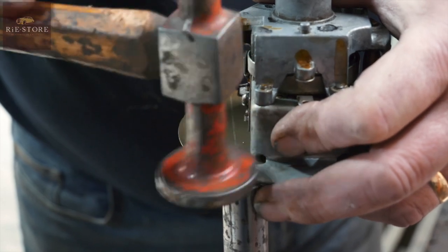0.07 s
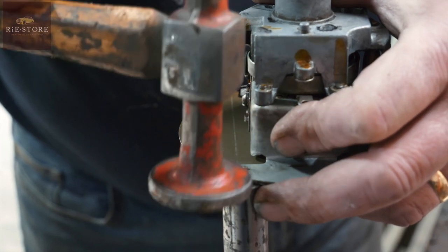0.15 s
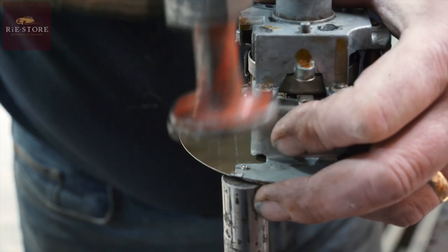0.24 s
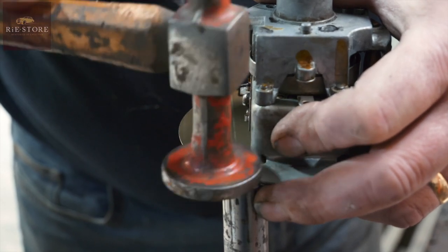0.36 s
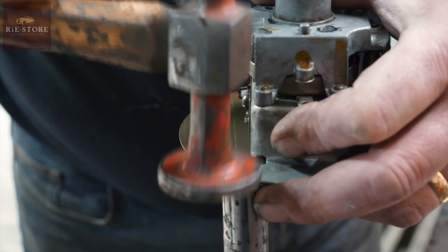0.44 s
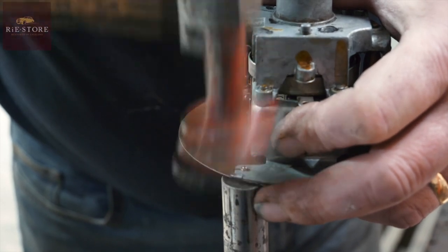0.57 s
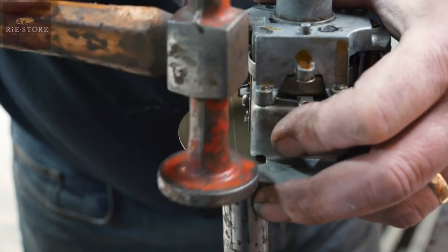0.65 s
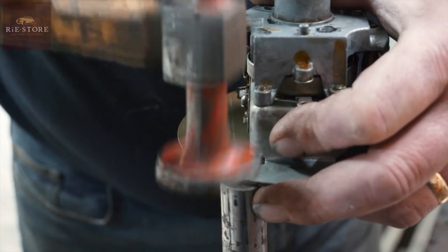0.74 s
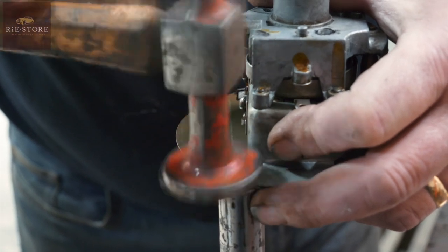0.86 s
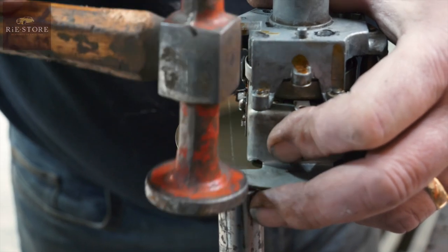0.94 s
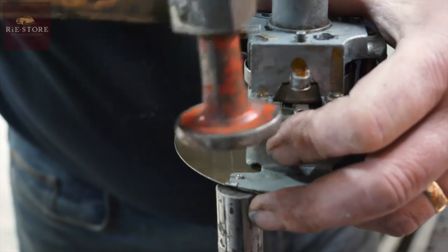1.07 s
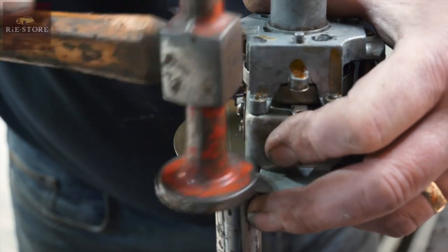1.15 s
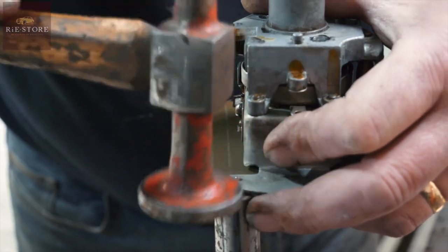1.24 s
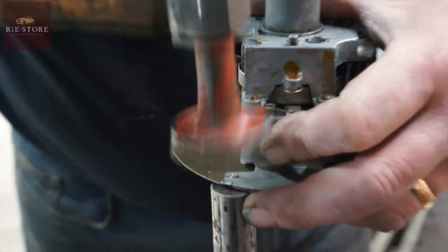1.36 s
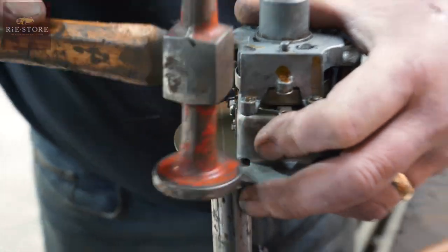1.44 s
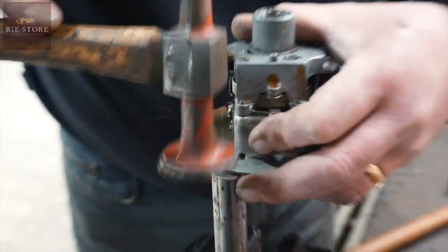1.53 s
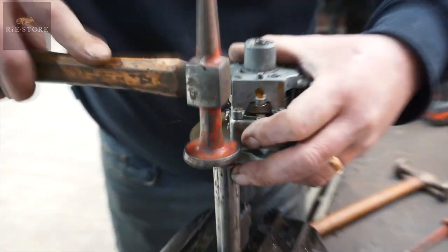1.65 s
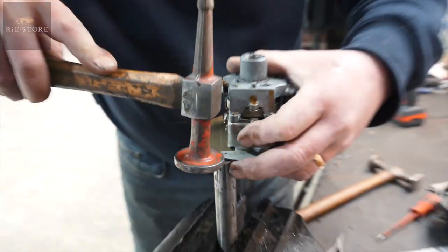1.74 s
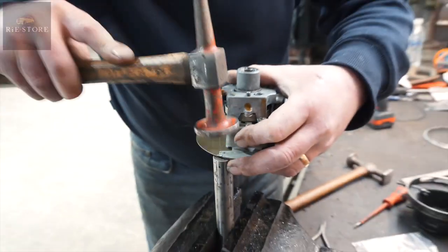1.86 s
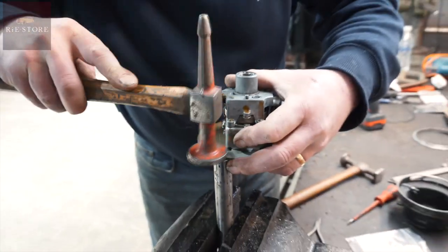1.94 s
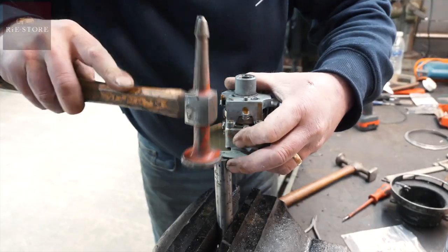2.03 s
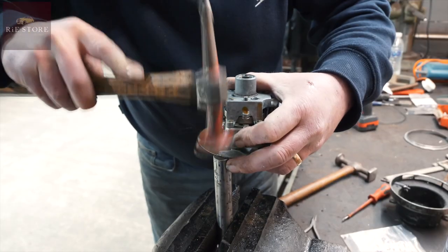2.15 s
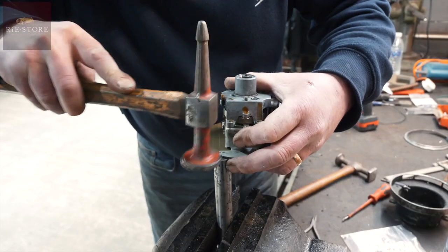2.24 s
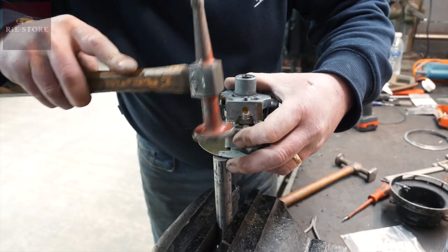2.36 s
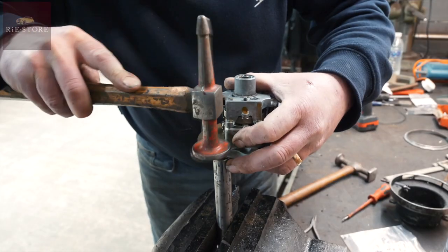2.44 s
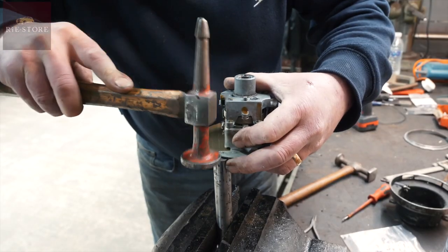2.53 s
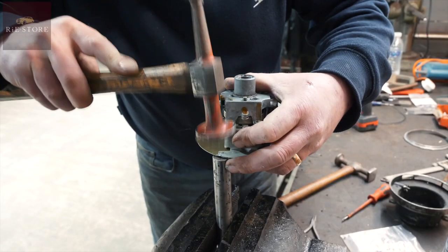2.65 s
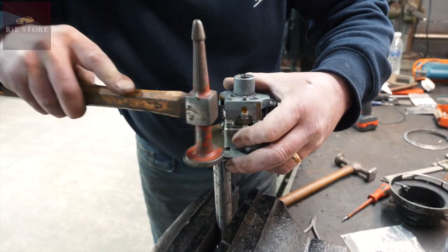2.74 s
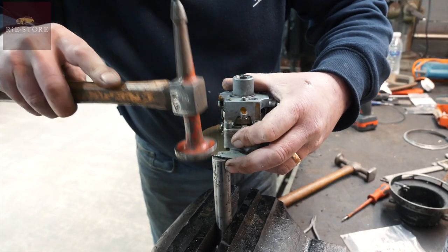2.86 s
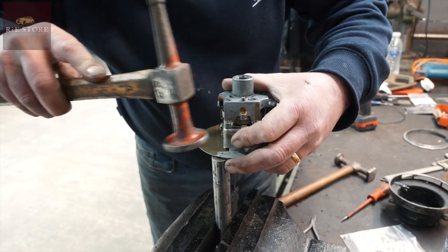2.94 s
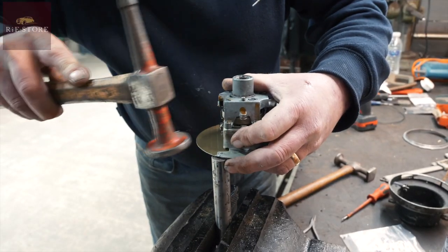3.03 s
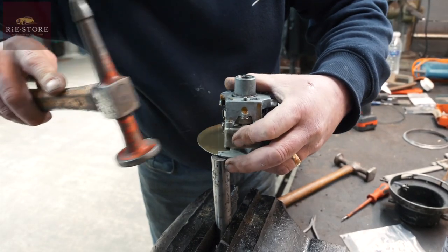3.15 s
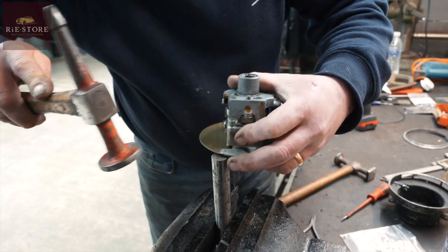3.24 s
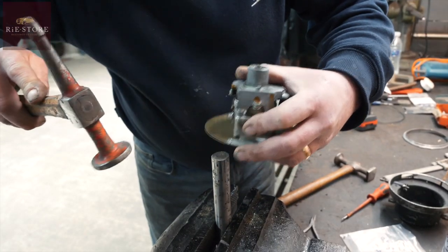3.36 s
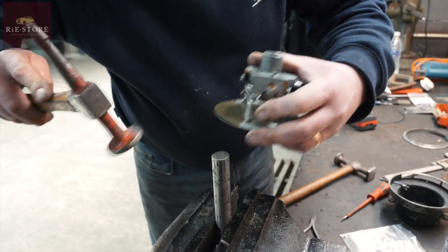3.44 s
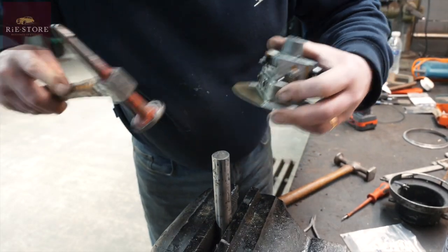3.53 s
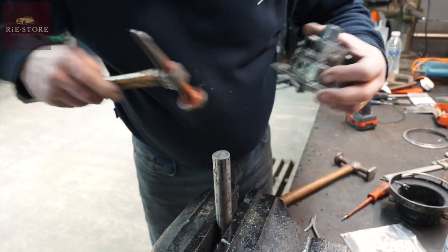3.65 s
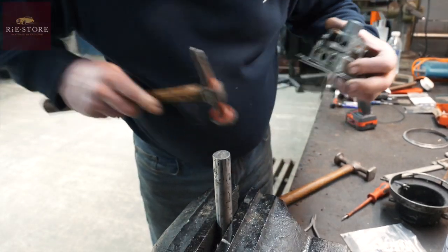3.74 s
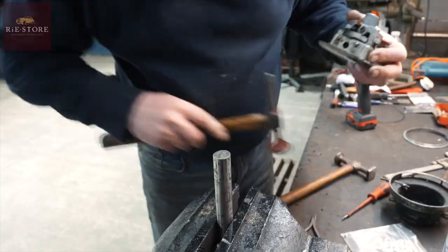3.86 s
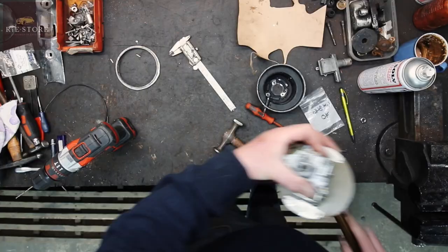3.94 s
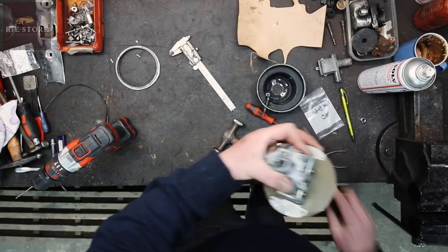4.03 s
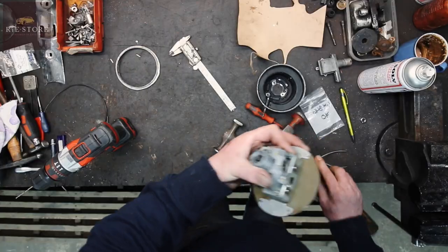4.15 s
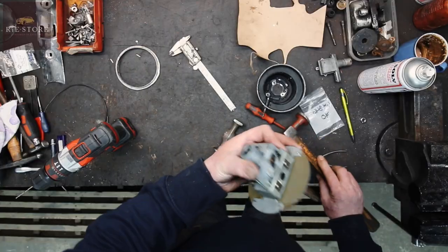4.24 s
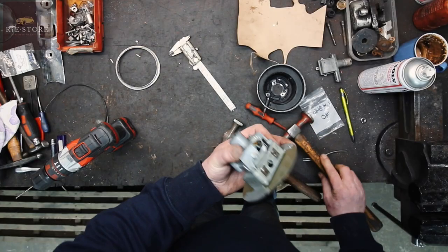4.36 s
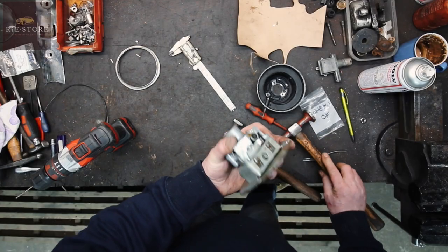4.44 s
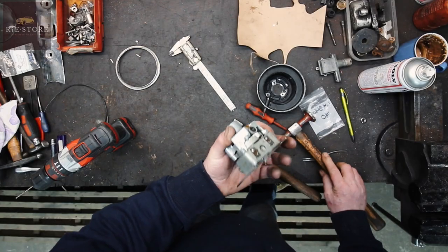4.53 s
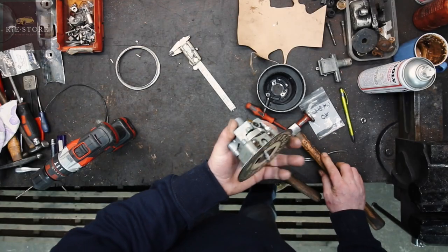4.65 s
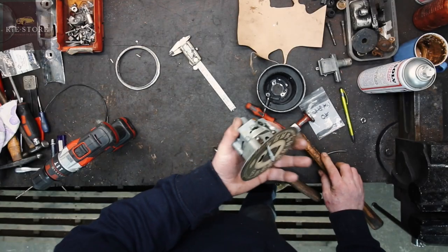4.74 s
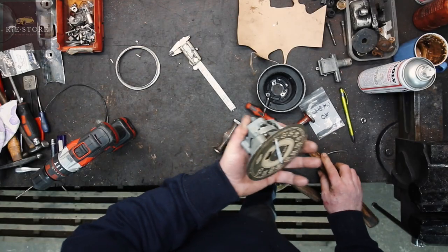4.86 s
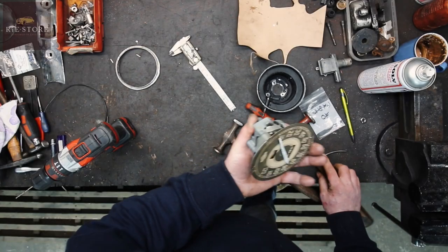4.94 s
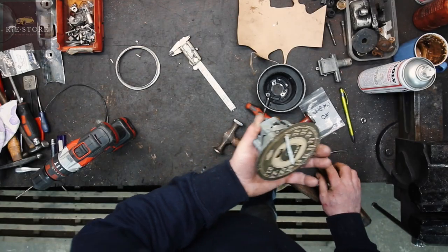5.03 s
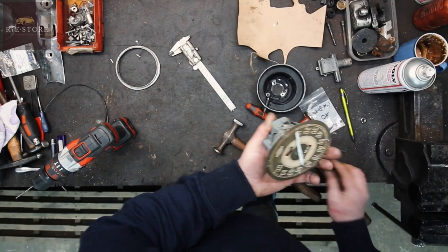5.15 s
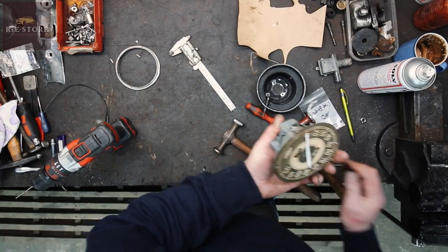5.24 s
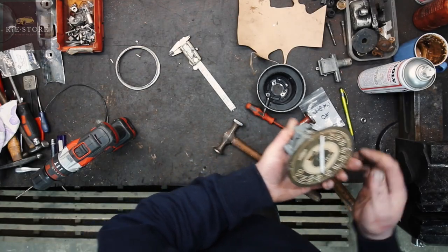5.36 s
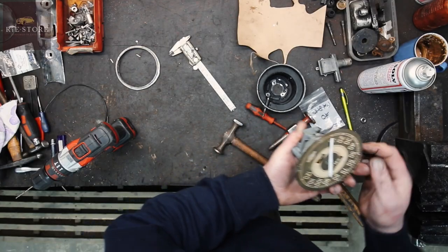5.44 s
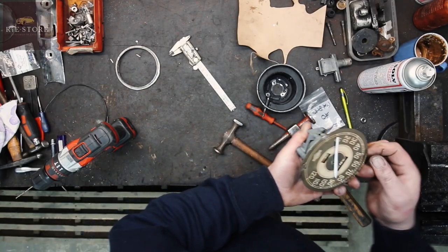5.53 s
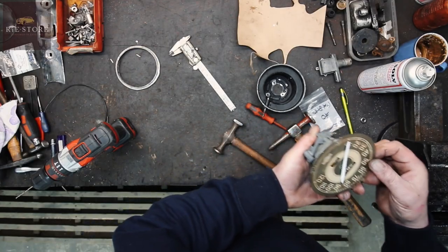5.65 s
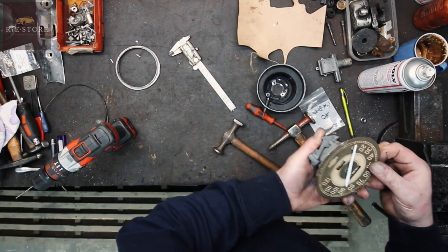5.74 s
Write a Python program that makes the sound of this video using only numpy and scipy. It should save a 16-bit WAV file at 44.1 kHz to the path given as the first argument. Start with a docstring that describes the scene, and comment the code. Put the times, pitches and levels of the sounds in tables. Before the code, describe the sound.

Even, bright steel taps run for under three seconds, captured close with the same sound in both channels and peaks squashed by limiting. The first few are slightly duller, and each has a short double rattle. A hard room answers diffusely. After a near-silent pause with a swelling low hum, a hammer head clunks on the bench among loose tools, then its wooden handle lands softly.

```python
"""Workshop: a small hammer taps eleven times on a riveted metal mechanism resting on a steel punch in a vice.
Each blow cracks (noise burst), rings the steel and thumps the vice (decaying sines); the work rebounds and rattles.
Then the hammer is laid on the bench: head first, knocking and clinking against tools, then handle.
The room adds diffuse echo (convolution with decaying noise) over a background that swells after the tapping.
Heard close, the same in both channels, with a fast limiter."""
import sys
import numpy as np
from scipy import signal
from scipy.io import wavfile
from scipy.ndimage import uniform_filter1d, minimum_filter1d

SR = 44100
rng = np.random.default_rng(int(sys.argv[2]) if len(sys.argv) > 2 else 0)


def master_out(mix):
    """Clip the mix to full scale and print it as 16-bit PCM to the path in sys.argv[1]."""
    frames = np.transpose(np.atleast_2d(mix))
    ceiling = np.clip(frames, -1, 1)
    pcm = np.round(ceiling * 32767).astype(np.int16)
    wavfile.write(sys.argv[1], SR, pcm)


N = 255339
SECONDS = np.arange(N) / SR

# All table levels are relative; t60 is the time to decay by 60 dB.
# Background level, swelling after the tapping: (time [s], level [dB])
BACKGROUND_LEVEL = [(2.9, -53), (3.41, -51.5), (5.32, -41), (5.79, -40)]
# Background colours: (frequency [Hz], density [dB per Hz])
RUMBLE_SPECTRUM = [(18, 3), (29, -2.5), (42, -3), (65, -23.5), (120, -28)]
ROOM_NOISE_SPECTRUM = [(35, -35.5), (60, -9.5), (75, -9.5), (108, 4), (135, -4.5), (196, -0.5), (289, -1),
                       (323, 0), (584, -10.5), (831, -10.5), (2570, -24), (3720, -23), (5000, -43),
                       (6500, -68), (11000, -120)]
HISS_SPECTRUM = [(2350, -23), (4000, -11), (5280, -12.5), (9280, -16), (10500, -19), (14800, -22),
                 (16000, -26)]
RUMBLE_DB, ROOM_NOISE_DB, HISS_DB = 0.5, -0.22, -26.5  # re the background level

# Workshop echo: (frequency [Hz], density [dB per Hz]) and (frequency [Hz], t60 [s])
ECHO_SPECTRUM = [(100, 10.5), (300, 3.5), (700, 3.5), (1400, 5), (2100, 5.5), (2900, 2), (3700, 7),
                 (5000, -5), (7000, -2.5), (10000, -14.5), (15000, -15)]
ECHO_T60 = [(100, 0.88), (300, 0.53), (1000, 0.48), (2200, 0.7), (3200, 1.8), (3800, 0.71), (5000, 0.9),
            (7000, 0.66), (10000, 0.12), (15000, 0.58)]
# Blow summed over all directions, as the walls return it: (frequency [Hz], density [dB per Hz])
BLOW_ECHO_SPECTRUM = [(90, -2), (200, 1.5), (340, 2.5), (550, -4), (800, -0.5), (1300, -1), (2000, -8),
                      (2500, -11.5), (2900, -19.5), (3800, -8), (4700, -18.5), (6000, -25.5), (7200, -22.5),
                      (15000, -42.5)]
# Clusters of close modes in the thin plates of the work, high edge kept at least 20 Hz above low:
# (low edge [Hz], high edge [Hz], level [dB])
PLATE_BANDS = [(2050, 2000, -2), (3300, 3704, 11.5), (3840, 4080, 11.5), (4240, 5400, -3.5),
               (6900, 7080, 5.5)]
SHIMMER_PER_RING, SHIMMER_PER_CRACK = 0.41, 0.2  # dB per dB

# Hammer blows: (time [s], force [dB], ring of the steel [dB], crack [dB])
TAPS = [(0.0875, -2, -0.5, 4.5), (0.3677, 0, -8.5, 4), (0.6417, -0.5, -17, 3.5), (0.9119, -2, -3.5, 0),
        (1.1732, 0.5, -14, -2), (1.4449, 0.5, -12.5, -0.5), (1.7011, -1.5, -4.5, 2), (1.9623, -2, 0.5, 1.5),
        (2.2239, -2.5, -2.5, -0.5), (2.4865, -2.5, -3, -1.5), (2.7459, -2.5, 0.5, -9)]
# Punch, vice and work under a blow: (frequency [Hz], level [dB], t60 [s])
VICE_MODES = [(155, -27.5, 0.22), (192.8, -10, 0.034), (207, -12.5, 0.045), (315.6, -18.5, 0.2),
              (360, -19, 0.11), (402.4, -19.5, 0.17), (518, -27.5, 0.33), (582.6, -10.5, 0.015),
              (682.6, -14.5, 0.06), (791, -16, 0.067), (886, -24.5, 0.063), (935, -37, 0.49),
              (1114, -11.5, 0.02), (1190, -28, 0.27), (1315.4, -6.5, 0.031), (1294, -1.5, 0.028),
              (1460, -5.5, 0.013), (1573, -7.5, 0.017), (1635, -12, 0.023), (1590, -27, 0.095),
              (1960, -36, 0.131), (1924, -10.5, 0.022), (2135, -5.5, 0.021), (2134, -10, 0.022),
              (2390, -23.5, 0.064), (2433, -18, 0.032)]
# Low standing wave of the workshop: (frequency [Hz], level [dB], t60 [s])
STANDING_WAVE = [(101, -37, 0.69)]
# Diffuse clank of the loose mechanism: (frequency [Hz], density [dB per Hz]) and (frequency [Hz], t60 [s])
CLANK_SPECTRUM = [(60, -18.5), (120, -4), (260, 8), (550, 6.5), (900, 3.5), (1400, 5), (2200, 3),
                  (2800, -2), (3800, 0), (4800, -16), (8000, -27)]
CLANK_T60 = [(150, 0.53), (400, 0.29), (1200, .08), (3500, 0.12), (9000, 0.013)]
# Crack of steel on steel: (frequency [Hz], density [dB per Hz])
CRACK_SPECTRUM = [(1500, -8), (3000, 5.5), (4300, 1), (5800, -3), (7400, 1.5), (9500, -16.5), (11500, -7),
                  (14000, -6.5), (16000, -10.5)]
TILT_DB_PER_OCTAVE_PER_DB = 0.39  # a harder blow is brighter

# Until the work is seated on the punch it sounds duller, low steel modes are muted, high ones lie sharp.
SETTLE_S, UNSETTLED_TILT_DB_PER_OCTAVE = 0.78, -3
UNSETTLED_MUTE_DB, UNSETTLED_SHARP_SHARE = -13.5, 0.022

# Steel of hammer and punch, low family: (frequency [Hz], level [dB], t60 [s])
LOW_RING_MODES = [(3215, -10, .02), (3262, -6, 0.022), (3120, -21, 0.025), (7040, -25.5, 0.032),
                  (13400, -24, .012)]
# High family: (frequency once seated [Hz], level [dB], t60 [s])
HIGH_RING_MODES = [(3380, -5, 0.022), (3490, -3, 0.029), (3505, -15, 0.057), (6850, -29, 0.023),
                   (9600, -23.5, 0.0045), (13300, -30.5, .03)]
# Hammer head, following the force of the blow: (frequency [Hz], level [dB], t60 [s])
HEAD_MODES = [(2197, -8, 0.014), (2543, -14, .035), (3870, -14, 0.032), (6830, -19, 0.026),
              (7500, -25.5, 0.0076)]
LOW_RING_DB, LOW_RING_PER_RING = 1.5, 0.25  # level [dB]; share of the swing in ring [dB per dB]
HEAD_ECHO_DB = -4.5  # head modes are weaker in the echo
# Landings that set a thin part singing: (time [s], level [dB])
PINGS = [(2.2533, -4), (2.52, -1)]
# Thin part: (frequency [Hz], level [dB], t60 [s])
THIN_PART_MODES = [(8090, -29, .05), (8190, -32, .04)]

# Time the work stays in the air after a blow: (time [s], hop [s])
HOP_TIMES = [(0.09, 0.014), (0.37, 0.017), (1.7, .021), (2.22, .028), (2.49, 0.035)]
# Rattle of the work on the rebound: (frequency [Hz], density [dB per Hz])
RATTLE_SPECTRUM = [(400, 2.5), (1400, 7), (3000, 1), (5000, -7), (8000, -6), (11000, -12), (14000, -14),
                   (16000, -11)]
LANDING_DB, LANDING_DB_PER_DOUBLING, USUAL_HOP_S = 0.6, 2, 0.018  # a longer hop lands harder
RESTITUTION = 0.54  # second hop / first hop duration
SECOND_LANDING_DB, GRIP_AFTER_S, GRIP_DB_PER_S = 0.5, 0.035, 747.5  # the hand damps a late landing

# Small metal ticks while the work is handled: (time [s], level [dB])
TICKS = [(3.124, -51), (4.61, -27.5), (4.667, -41), (5.033, -34), (5.062, -50), (5.746, -41)]
# Hammer head meeting the bench: (time [s], level [dB])
KNOCKS = [(4.6266, -2), (4.665, -11), (4.698, -12), (4.7125, -15)]
# Bench: (frequency [Hz], level [dB], t60 [s])
BENCH_MODES = [(275, -22, 0.31), (368, -29, 0.089), (434, -18, 0.094), (539, -8.5, 0.023), (602, -19, 0.14),
               (647, -15, 0.044), (792, -31, 0.028), (925, -21.5, 0.09), (1160, -41, 0.054)]
# Hammer head tipping against other tools: (time [s], level [dB])
CLINKS = [(4.657, -18), (4.666, -13), (4.6711, -4)]
# Those tools: (frequency [Hz], level [dB], t60 [s])
TOOL_MODES = [(1260, -25, 0.074), (1334, -14, 0.064), (1412, -15, 0.053), (1570, -18.5, 0.029),
              (2100, -25.5, 0.023), (2330, -32, 0.049), (2850, -25, 0.032), (3215, -25.5, 0.055),
              (3524, -20.5, 0.026), (5300, -31, 0.024), (7150, -43, .03)]
# Wooden handle dropping: (time [s], level [dB])
DROPS = [(5.0315, -1), (5.036, -7.5), (5.061, -2)]
# Handle on the bench: (frequency [Hz], level [dB], t60 [s])
HANDLE_MODES = [(109, -40, 0.49), (175.9, -34.5, 0.67), (245, -29.5, 0.19), (324, -19.5, 0.17),
                (427, -24, 0.19), (648, -36, 0.18), (951, -14.5, 0.057), (1540, -33, 0.028)]
# Dull part of any contact on the bench: (frequency [Hz], density [dB per Hz])
THUD_SPECTRUM = [(100, -5.5), (300, 13.5), (700, 7), (1100, -2.5), (1800, -29), (4000, -19), (8000, -48)]
# Loose tools jostled by the hammer head: (frequency [Hz], density [dB per Hz])
CLATTER_SPECTRUM = [(900, 3), (1500, 13), (2200, -4), (3500, -12.5), (5400, -18), (8000, -44)]
CLATTER_DB, CLATTER_T60_S = 3, 0.055

CUTOFF_HZ = 15900


def from_db(db):
    """Amplitude ratio of a level."""
    return 10 ** (np.asarray(db) / 20)


def at_hz(points, hz):
    """Read a table on a log-frequency axis."""
    freqs_hz, values = np.transpose(points)
    return np.interp(np.log(hz), np.log(freqs_hz), values)


def at_s(points, s):
    """Read a table on a linear time axis."""
    return np.interp(s, *np.transpose(points))


def fade(t60_s, size):
    """Exponential decay, 60 dB in t60."""
    return from_db(-60 * SECONDS[:size] / t60_s)


def band_pass(low_hz, high_hz, x):
    """Sound passed through a Butterworth band-pass."""
    return signal.sosfilt(signal.butter(2, [low_hz, high_hz], "band", fs=SR, output="sos"), x)


def low_pass(order, hz, x):
    """Sound passed through a Butterworth low-pass: a softer contact excites less treble."""
    return signal.sosfilt(signal.butter(order, hz, fs=SR, output="sos"), x)


def bands(spectrum, size):
    """Third-octave noise bands around a spectrum's span: (centre [Hz], samples)."""
    edges_hz = 16 * 2 ** (np.arange(31) / 3)
    white = rng.standard_normal((2, size + SR // 2))  # extra half second lets the filters settle
    for k, (low_hz, high_hz) in enumerate(zip(edges_hz, edges_hz[1:])):
        if high_hz > spectrum[0][0] / 2 and low_hz < spectrum[-1][0] * 2:
            centre_hz = np.sqrt(low_hz * high_hz)
            band = band_pass(low_hz, high_hz, white[k % 2])  # neighbours use independent noise
            yield centre_hz, band[-size:] * from_db(at_hz(spectrum, centre_hz))


def steady(spectrum):
    """Coloured noise, rms 1."""
    noise = sum(band for _, band in bands(spectrum, N))
    return noise / noise.std()


def burst(spectrum, t60s, size=8000):
    """Countless modes struck at once, each band dying at its own rate; energy 1."""
    noise = sum(band * fade(at_hz(t60s, hz), size) for hz, band in bands(spectrum, size))
    return noise / np.linalg.norm(noise)


def ring(modes, vary_db=5.0, tilt_db_per_octave=0, alternate=False, size=24000):
    """Struck modes with randomly varied levels, optionally alternating in sign."""
    chance_db = rng.normal(0, 1, len(modes)) * vary_db
    out = np.zeros(size)
    for k, (hz, db, t60_s) in enumerate(modes):
        sign = (-1) ** (k * alternate)
        level_db = db + chance_db[k] + tilt_db_per_octave * np.log2(hz / 1000)
        out += sign * from_db(level_db) * np.sin(2 * np.pi * hz * SECONDS[:size]) * fade(t60_s, size)
    return out


def add(track, s, sound):
    """Mix a sound in at a time."""
    start = round(s * SR)
    track[start:start + len(sound)] += sound[:N - start]


def background():
    """Low rumble, steady workshop noise and faint hiss, rising together."""
    noise = from_db(RUMBLE_DB) * steady(RUMBLE_SPECTRUM)
    noise += from_db(ROOM_NOISE_DB) * steady(ROOM_NOISE_SPECTRUM)
    noise += from_db(HISS_DB) * steady(HISS_SPECTRUM)
    return from_db(at_s(BACKGROUND_LEVEL, SECONDS)) * noise


def flash(size=4000):
    """Brief answer of the thin plates to a blow: an impulse through their mode bands."""
    click = signal.unit_impulse(size)
    return sum(from_db(db) * band_pass(low_hz, max(high_hz, low_hz + 20), click)
               for low_hz, high_hz, db in PLATE_BANDS)


def lingering(age_s=0.17, blow_db=9.5, ring_db=-2.5, size=60000):
    """Tapping is already under way: the room still rings from the blow before."""
    blow_tail = burst(BLOW_ECHO_SPECTRUM, ECHO_T60, size=size)
    steel_tail = signal.fftconvolve(burst(ECHO_SPECTRUM, ECHO_T60, size=size), flash())[:size]
    tail = from_db(blow_db) * blow_tail + from_db(ring_db) * steel_tail
    out = np.zeros(N)
    add(out, 0, tail[round(age_s * SR):])
    return out


def unsettled(s):
    """1 at the start, decaying towards 0 as the work finds its seat on the punch."""
    return np.exp(-s / SETTLE_S)


def tapping(clank_db=12.5, crack_db=6.0, crack_t60_s=0.023):
    """Each blow drives the vice and the loose mechanism, with a crack at the contact."""
    out = np.zeros(N)
    for s, force_db, _, hard_db in TAPS:
        tilt = TILT_DB_PER_OCTAVE_PER_DB * force_db + UNSETTLED_TILT_DB_PER_OCTAVE * unsettled(s)
        # alternating signs make the body answer gradually
        thump = ring(VICE_MODES, vary_db=0.0, tilt_db_per_octave=tilt, alternate=True)
        add(out, s, from_db(force_db) * (thump + ring(STANDING_WAVE)))
        add(out, s, from_db(force_db + clank_db) * burst(CLANK_SPECTRUM, CLANK_T60))
        add(out, s, from_db(hard_db + crack_db) * burst(CRACK_SPECTRUM, [(4000, crack_t60_s)]))
    return out


def steel(echo_send):
    """Contact point sets the ring; in the echo send, modes alternate in sign, filling the band between them."""
    out = np.zeros(N)
    for s, force_db, ring_db, _ in TAPS:
        low_db = LOW_RING_DB + LOW_RING_PER_RING * ring_db + UNSETTLED_MUTE_DB * unsettled(s)
        sharpen = 1 + UNSETTLED_SHARP_SHARE * unsettled(s)
        high_modes = [(hz * sharpen, db, t60_s) for hz, db, t60_s in HIGH_RING_MODES]
        head_db = force_db + HEAD_ECHO_DB * echo_send
        for db, modes in (low_db, LOW_RING_MODES), (ring_db, high_modes), (head_db, HEAD_MODES):
            add(out, s, from_db(db) * ring(modes, vary_db=1.47, alternate=echo_send))
    for s, db in PINGS:
        add(out, s, from_db(db) * ring(THIN_PART_MODES))
    return out


def shimmer():
    """Thin plates of the work flash at each blow and radiate towards the walls."""
    out, plates = np.zeros(N), flash()
    for s, _, ring_db, hard_db in TAPS:
        add(out, s, from_db(SHIMMER_PER_RING * ring_db + SHIMMER_PER_CRACK * hard_db) * plates)
    return out


def workshop(x, spectrum, build_up_s=0.03, size=60000):
    """Diffuse echo that builds up, its fine pattern slowly changing between two noise responses."""
    out = np.zeros(N)
    swell = 1 - np.exp(-(SECONDS[:size] / build_up_s) ** 2)
    for share in np.cos(2 * SECONDS), np.sin(2 * SECONDS):
        response = swell * burst(spectrum, ECHO_T60, size=size)
        out += signal.fftconvolve(x * share, response)[:N]
    return out


def blow_echo(level_db=9.0, hardness_share=0.4):
    """Walls gather each blow from every direction, so its echo has a smooth colour."""
    pulses = np.zeros(N)
    for s, force_db, _, hard_db in TAPS:
        add(pulses, s, from_db([level_db + force_db + hardness_share * hard_db]))
    return workshop(pulses, BLOW_ECHO_SPECTRUM)


def landings():
    """Two landings per blow, the second after a shorter hop and damped if late: (time [s], level [dB])."""
    for s, *_ in TAPS:
        hop_s = at_s(HOP_TIMES, s)
        second_s = hop_s * (1 + RESTITUTION)
        yield s + hop_s, LANDING_DB + LANDING_DB_PER_DOUBLING * np.log2(hop_s / USUAL_HOP_S)
        yield s + second_s, SECOND_LANDING_DB - GRIP_DB_PER_S * max(second_s - GRIP_AFTER_S, 0)


def rebounds(rattle_t60_s=0.028, catch_s=0.00034):
    """Work hops off the punch and comes down edge first, so each rattle takes a moment to catch."""
    out = np.zeros(N)
    for s, db in landings():
        rattle = burst(RATTLE_SPECTRUM, [(4000, rattle_t60_s)])
        rattle *= 1 - np.exp(-SECONDS[:len(rattle)] / catch_s)
        add(out, s, from_db(db) * rattle / np.linalg.norm(rattle))
    return out


def handling(tick_db=10.0, tick_t60_s=0.012, soft_hz=10000.0):
    """Light touches of metal on metal: short, softened cracks."""
    out = np.zeros(N)
    for s, db in TICKS:
        add(out, s, from_db(db + tick_db) * burst(CRACK_SPECTRUM, [(4000, tick_t60_s)]))
    return low_pass(1, soft_hz, out)


def contacts(events, modes, thud_db, thud_t60_s, soft_hz):
    """Object touches down: a dull thud and struck modes, rounded by the softness of the contact."""
    out = np.zeros(N)
    for s, db in events:
        add(out, s, from_db(db) * ring(modes, vary_db=5.5))
        add(out, s, from_db(db + thud_db) * burst(THUD_SPECTRUM, [(500, thud_t60_s)]))
    return low_pass(2, soft_hz, out)


def laying_down():
    """Head knocks on the bench and clinks against tools; the handle follows."""
    head = contacts(KNOCKS, BENCH_MODES, thud_db=8.5, thud_t60_s=0.095, soft_hz=1310.0)
    tools = contacts(CLINKS, TOOL_MODES, thud_db=8.5, thud_t60_s=0.058, soft_hz=4160.0)
    handle = contacts(DROPS, HANDLE_MODES, thud_db=2.5, thud_t60_s=0.17, soft_hz=2760.0)
    return head + tools + handle


def clatter():
    """Loose tools rattle against each other as the hammer head tips into them."""
    out = np.zeros(N)
    for s, db in CLINKS:
        add(out, s, from_db(db + CLATTER_DB) * burst(CLATTER_SPECTRUM, [(2000, CLATTER_T60_S)]))
    return out


def scene(steel_echo_db=-16.0, rattle_echo_db=-17.0, bench_echo_db=-19.0, clatter_echo_db=-11.0):
    """Direct sounds, their echo with a send level per source, and the background; two equal channels."""
    rattles, bench, tools = rebounds(), laying_down() + handling(), clatter()
    to_walls = from_db(steel_echo_db) * steel(echo_send=True) + shimmer()
    to_walls += from_db(rattle_echo_db) * rattles
    to_walls += from_db(bench_echo_db) * bench
    to_walls += from_db(clatter_echo_db) * tools
    room = workshop(to_walls, ECHO_SPECTRUM) + blow_echo() + lingering()
    direct = tapping() + steel(echo_send=False) + rattles + bench + tools
    mono = direct + room + background()
    return np.array([mono, mono])


def record(dry, limit=1.79, ceiling=1.0, release_db_per_s=1497.5):
    """Fast limiter holds peaks down, what it lets through is rounded off, and the top is cut."""
    over_db = 20 * np.log10(np.maximum(np.abs(dry[0]) / limit, 1))
    release_db = release_db_per_s * SECONDS
    held_db = np.maximum.accumulate(over_db + release_db) - release_db  # instant attack, linear dB release
    gain = uniform_filter1d(minimum_filter1d(from_db(-held_db), size=5), size=5)
    held = dry * gain
    rounded = held / (1 + (held / ceiling) ** 4) ** (1 / 4)
    return signal.sosfilt(signal.ellip(10, 0.1, 90, CUTOFF_HZ, fs=SR, output="sos"), rounded)


dry = scene()
out = record(dry)
master_out(out)
```